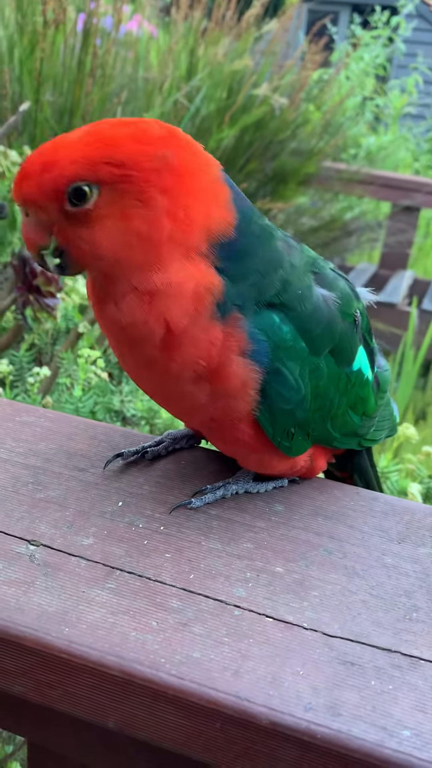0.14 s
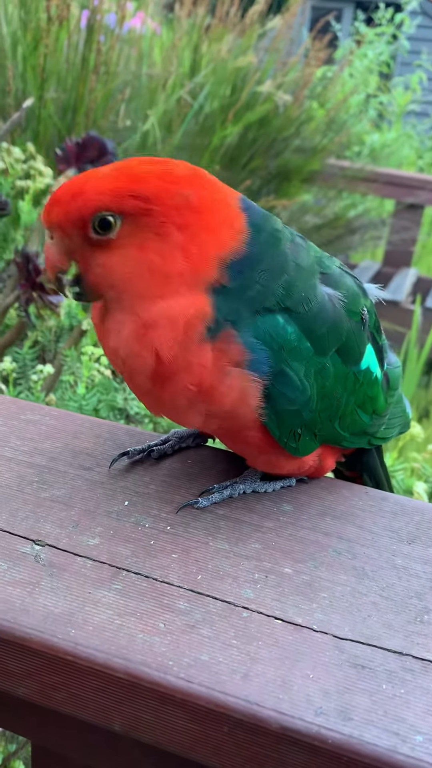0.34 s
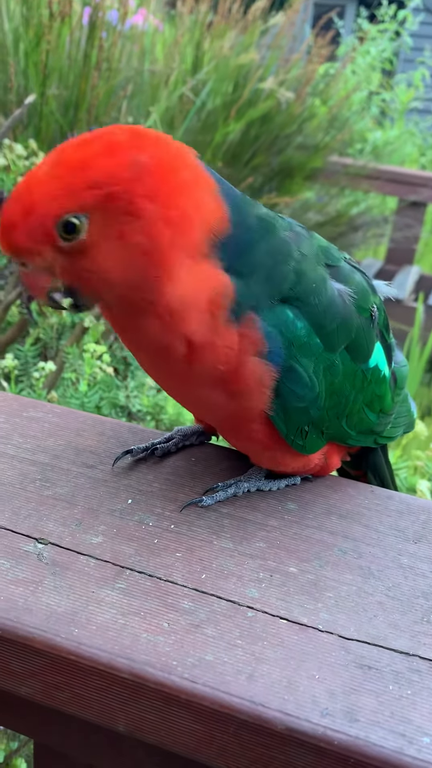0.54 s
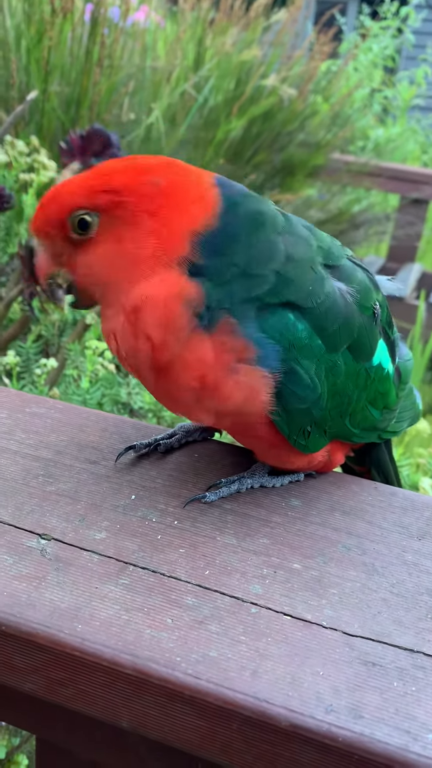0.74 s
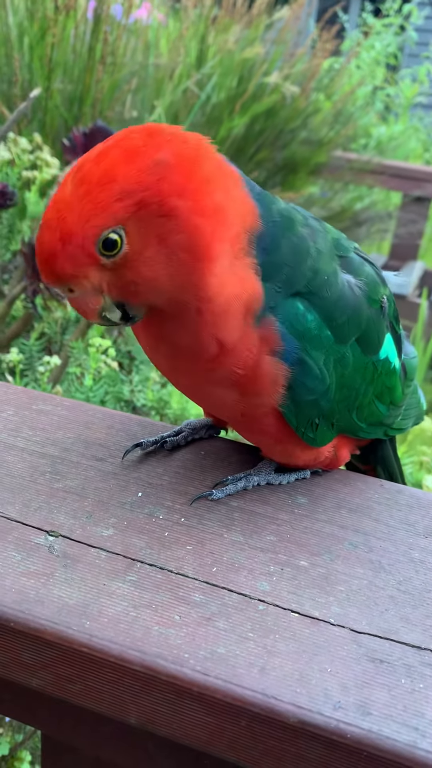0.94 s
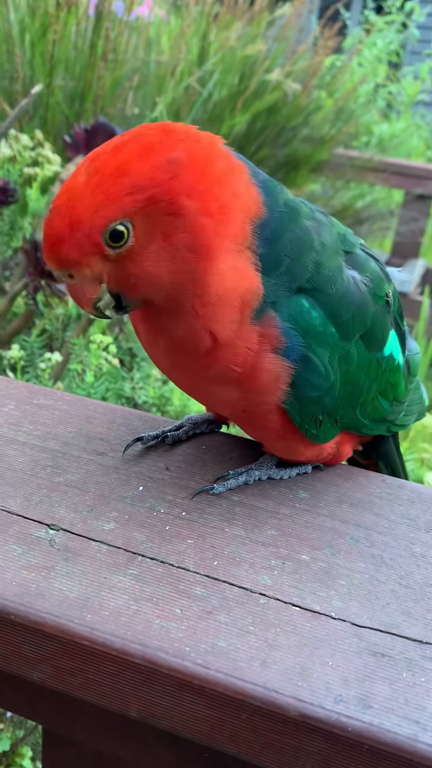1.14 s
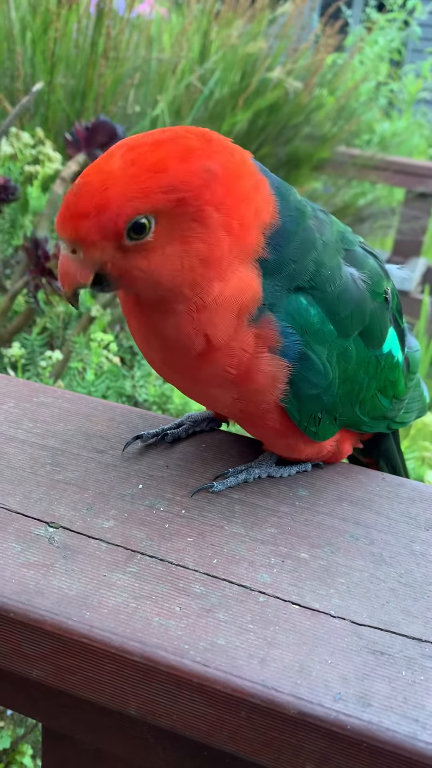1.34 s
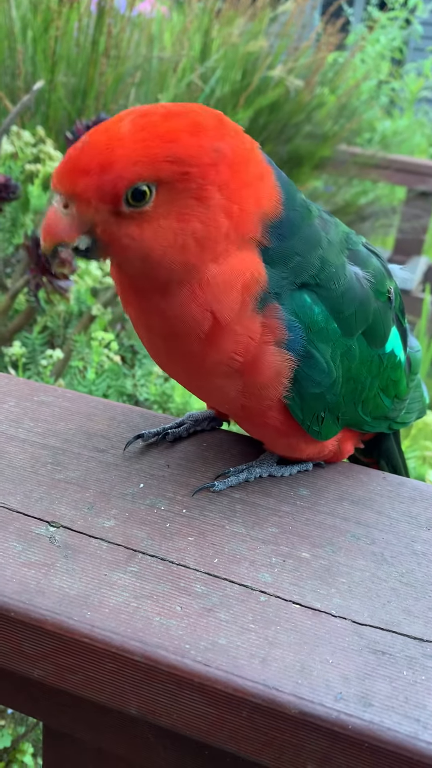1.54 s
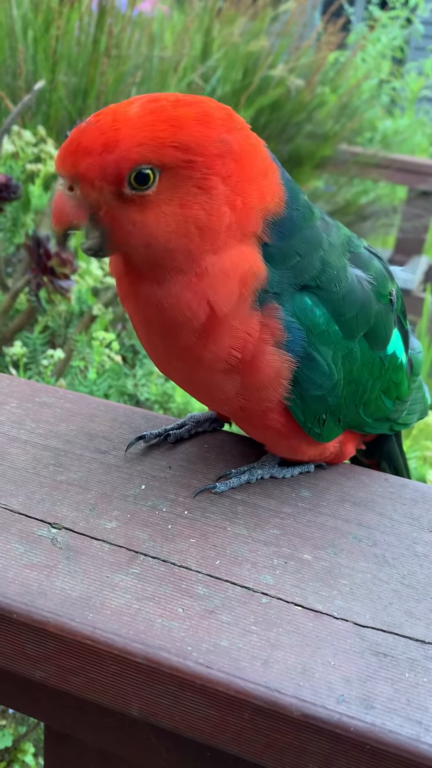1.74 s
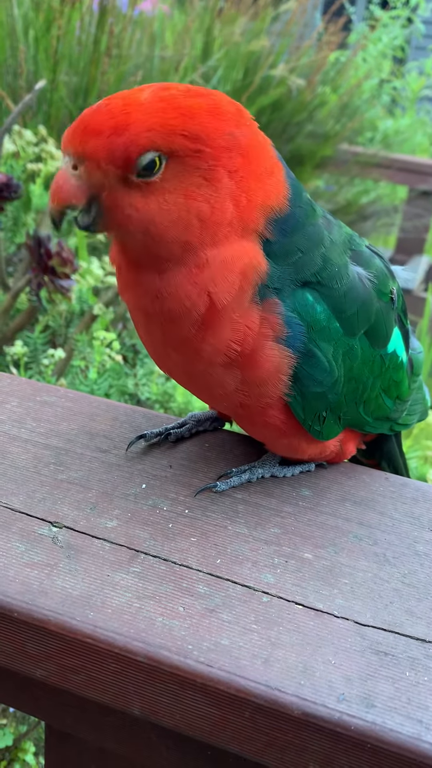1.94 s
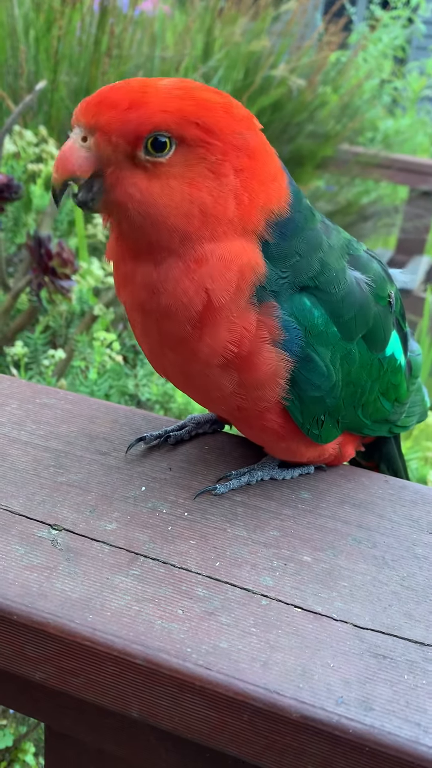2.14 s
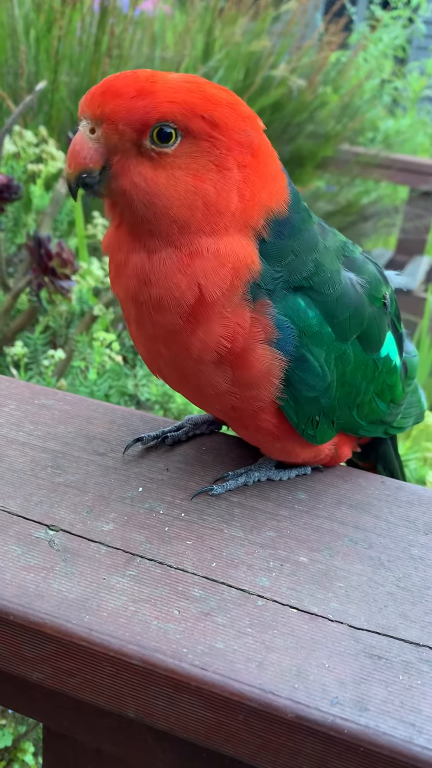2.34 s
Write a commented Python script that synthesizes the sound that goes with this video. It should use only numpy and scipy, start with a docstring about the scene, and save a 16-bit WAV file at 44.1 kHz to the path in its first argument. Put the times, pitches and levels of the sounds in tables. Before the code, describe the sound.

Close parrot squawks, bright and raspy, crowd the first second; afterwards come two weak wavering whines, tiny dry ticks and a dull knock, with light reflections from a deck and house wall outdoors.

```python
"""A garden by a house: a parrot gives harsh, mostly rising squawks close by, then two soft whines.
One side of its syrinx sings a bright harmonic tone that breaks into rasp; the other adds a lower note.
Filtered noise bursts make small ticks and one knock; arched sines whistle as far birds.
Shaped noise lays a low outdoor rumble; deck, house wall and plants answer the sounds by convolution."""
import sys
import numpy as np
from scipy import signal
from scipy.fft import rfft, irfft
from scipy.io import wavfile
from scipy.ndimage import uniform_filter1d

SR = 44100
rng = np.random.default_rng(int(sys.argv[2]) if len(sys.argv) > 2 else 0)


def to_wav(sig):
    """Store sig (one row per channel, or 1-D mono) as 16-bit WAV at the path in sys.argv[1].

    Samples outside -1..1 are clipped; the rate is SR.
    """
    pcm = np.clip(np.atleast_2d(sig), -1, 1) * 32767
    pcm = np.round(pcm).astype(np.int16)
    wavfile.write(sys.argv[1], SR, pcm.T)  # frames by channels


N = 105840  # samples: 2.4 s


def amp(db):
    """Decibels to gain."""
    return 10 ** (np.asarray(db) / 20)


def unit(x):
    """Scales to rms 1."""
    return x / np.sqrt(np.mean(x ** 2) + 1e-20)


def read(points, hz):
    """Reads a table on a log-frequency axis."""
    table_hz, value = np.transpose(points)
    return np.interp(np.log(hz + 1), np.log(table_hz + 1), value)


def add(mix, start_s, sound):
    """Mixes a sound in at its start time, cut off at the end of the mix."""
    part = mix[max(round(start_s * SR), 0):][:len(sound)]
    part += sound[:len(part)]


def colour(x, points):
    """Filters by a (freq_hz, gain_db) table, then scales to rms 1."""
    gain = amp(read(points, np.fft.rfftfreq(len(x), 1 / SR)))
    return unit(irfft(rfft(x) * gain, len(x)))


def wobble(rate_hz):
    """Smooth random drift: noise with a Gaussian roll-off at the rate, rms 1."""
    hz = np.fft.rfftfreq(N, 1 / SR)
    return unit(irfft(rfft(rng.standard_normal(N)) * np.exp(-(hz / rate_hz) ** 2), N))


def follow(rows):
    """The samples that a gesture spans, a short fade at its ends, and its interpolated controls."""
    time_s, *columns = np.transpose(rows)
    at = np.arange(int(time_s[0] * SR), int(time_s[-1] * SR))
    fade = np.clip(np.minimum(at - at[0], at[-1] - at) / 130, 0, 1)  # 130 samples, about 3 ms
    return at, fade, [np.interp(at / SR, time_s, column) for column in columns]


def stack(turns, gains):
    """Harmonics of a running phase in cycles, one gain per row, balanced to a nominal rms of 1."""
    k = np.arange(len(gains))[:, None] + 1
    waves = (gains * np.cos(2 * np.pi * k * turns)).sum(0)
    return np.sqrt(2) * waves / np.linalg.norm(gains, axis=0)


# outdoor background spectrum, relative: freq_hz, density_db (per Hz)
AIR_COLOUR = [(30, -36), (55, 6.5), (72, -5.5), (95, -3.5), (135, -6.5), (170, -18), (410, -18.5),
              (600, -24), (1400, -27), (2500, -36), (4000, -42), (7000, -48), (15500, -49.5)]
# left-right likeness of the air: freq_hz, likeness (1 = identical)
AIR_LIKENESS = [(60, 0.98), (130, 0.95), (290, 0.74), (640, 0.078), (4500, 1)]
AIR_DB, AIR_PATCH_DB = -53, 2.5  # overall level; rms drift of the patches


def air():
    """Low rumble and faint hiss: random spectra whose level drifts in patches of time and pitch."""
    size = 4096
    hz = np.fft.rfftfreq(size, 1 / SR)
    a, b, c, d, patches = rng.standard_normal((N // 1024 + 5, len(hz), 5)).T
    patches = uniform_filter1d(patches, size=14, axis=0)  # smooth over frequency
    patches = unit(uniform_filter1d(patches, size=7, axis=1))  # then over time
    same = np.clip(read(AIR_LIKENESS, hz), -1, 1)[:, None]
    left = a + 1j * b
    right = same * left + np.sqrt(1 - same ** 2) * (c + 1j * d)
    level = amp(read(AIR_COLOUR, hz)[:, None] + AIR_PATCH_DB * patches)
    noise = signal.istft(np.array([left, right]) * level, nperseg=size, noverlap=size - size // 4)[1]
    return amp(AIR_DB) * unit(noise[:, :N])


# far birds: start_s, length_s, pitch_hz (at the top of the arch), peak_db
FAR_WHISTLES = [(1.029, 0.086, 1940, -60), (1.29, 0.12, 1886, -69), (1.557, 0.097, 1945, -68.5)]


def far_birds():
    """Faint sine whistles, slightly arched: pitch and level swell and sink together."""
    out = np.zeros(N)
    for start_s, length_s, pitch_hz, peak_db in FAR_WHISTLES:
        arch = np.sin(np.pi * np.arange(0, 1, 1 / (length_s * SR)))
        bend = 0.03 * (arch - 1) + 0.015 * wobble(150)[:len(arch)]
        turns = np.cumsum(pitch_hz * (1 + bend)) / SR
        add(out, start_s, amp(peak_db) * arch * np.sin(2 * np.pi * turns))
    return out


def tap(onset_db, decay_s, points):
    """A short burst of coloured noise that dies away exponentially at once."""
    decay = np.exp(-np.arange(N) / SR / decay_s)
    return amp(onset_db) * decay * colour(rng.standard_normal(N), points)


# dry ticks of beak or claw: start_s, onset_db
TICK_HITS = [(1.782, -51), (1.809, -53), (1.907, -60)]
# bright colour of a tick: freq_hz, gain_db
TICK_TINT = [(500, -33), (2500, -9), (4500, 2), (8000, -20), (15000, -9)]
# dull colour of the knock: freq_hz, gain_db
KNOCK_TINT = [(100, -20), (380, -9), (1050, 7.5), (1600, -5), (4500, -13), (12000, -33)]
TICK_DECAY_S = 0.001
KNOCK_START_S, KNOCK_ONSET_DB, KNOCK_DECAY_S = 2.246, -53, 0.0097


def taps():
    """Small ticks and one dull knock, each a fast-decaying noise burst."""
    out = np.zeros(N)
    for start_s, onset_db in TICK_HITS:
        add(out, start_s, tap(onset_db, TICK_DECAY_S, TICK_TINT))
    add(out, KNOCK_START_S, tap(KNOCK_ONSET_DB, KNOCK_DECAY_S, KNOCK_TINT))
    return out


# unsteadiness of the voices: rates of pitch jitter and of level shimmer
JITTER_HZ, SHIMMER_HZ = 420, 160
# soft whines, one list per gesture: time_s, pitch_hz, level_db
WHINE_GESTURES = [
    [(1.632, 1554, -68), (1.66, 1731, -63), (1.70, 1720, -57), (1.757, 1774, -65.5)],
    [(1.843, 1682, -56.5), (1.862, 1743, -57.5), (1.897, 1763, -51.5), (1.945, 1800, -64)],
    [(1.905, 1529, -45), (1.918, 1281, -55), (1.96, 1341, -61)],
]
# throat colour of the whines: freq_hz, gain_db
WHINE_TINT = [(1250, 0), (1750, 5), (2650, 3.5), (3550, -1), (4200, -26.5)]
WHINE_JITTER, WHINE_BREAK_JITTER, WHINE_SHIMMER = 0.015, 0.022, 0.31  # rms shares
WHINE_BREAK_HZ = 1600  # below this pitch the voice turns rougher


def whines():
    """Two quiet, wavering notes; under the end of the second, the other voice falls away roughly."""
    out, k = np.zeros(N), np.arange(1, 8)[:, None]
    for rows in WHINE_GESTURES:
        at, fade, (pitch_hz, level_db) = follow(rows)
        depth = np.where(pitch_hz < WHINE_BREAK_HZ, WHINE_BREAK_JITTER, WHINE_JITTER)
        turns = np.cumsum(pitch_hz * (1 + depth * wobble(JITTER_HZ)[at])) / SR
        tone = stack(turns, amp(read(WHINE_TINT, k * pitch_hz)))
        shimmer = 1 + WHINE_SHIMMER * wobble(SHIMMER_HZ)[at]
        out[at] += fade * amp(level_db) * shimmer * tone
    return out


# held note of the lower voice: time_s, pitch_hz, level_db
LOW_GESTURE = [(.412, 852, -49), (.43, 862.6, -40), (.48, 853, -36), (.492, 870, -42.5), (.505, 900, -50)]
# its harmonics from the first up, odd ones leading: gain_db
LOW_HARMONICS = [-4, -13, 2, -41, -4.5, -20]


def low_voice():
    """The other side of the syrinx: a steadier, hollow note of mostly odd harmonics."""
    out = np.zeros(N)
    at, fade, (pitch_hz, level_db) = follow(LOW_GESTURE)
    turns = np.cumsum(pitch_hz * (1 + 0.0057 * wobble(180)[at])) / SR
    out[at] = fade * amp(level_db) * stack(turns, amp(LOW_HARMONICS)[:, None])
    return out


# sung notes, one list each: time_s, pitch_hz, tone_db, rasp_db, throat_boost_db
SQUAWK_NOTES = [
    [(.211, 1148, -49, -81, 12), (.226, 1245, -49.5, -47.5, 10), (.252, 1367, -36, -42, 5),
     (.272, 1365, -47, -38, 8.5), (.315, 1401, -36, -36, 20), (.36, 1452, -51, -49.5, -1)],
    [(.342, 1545, -40, -72, -21), (.365, 1593, -43, -76, -3), (.435, 1701, -41, -50, -9),
     (.474, 1739, -44, -45.5, -8), (.485, 1768, -28.5, -55, 39), (.496, 1810, -39, -57, 17)],
    [(.484, 1353, -50, -38, 4), (.5, 1360, -43.5, -35.5, 2), (.517, 1447, -33.5, -35.5, 42),
     (.537, 1437, -45.5, -55, 13)],
    [(.586, 1505, -57, -89, -11), (.606, 1624, -39, -48, -1), (.665, 1693, -45.5, -73, -10)],
    [(.603, 1285, -48, -41.5, 39), (.622, 1350, -32, -34.5, 24.5), (.671, 1420, -32.5, -33, 33),
     (.686, 1477, -28.5, -45, 32), (.7, 1543, -27.5, -50, 36), (.716, 1494, -45, -47, 20)],
    [(.802, 1223, -66, -45, 24), (.814, 1302, -45, -39, 24), (.836, 1387, -33, -39.5, 7.5),
     (.855, 1433, -36, -38, 25.5), (.882, 1515, -32.5, -41.5, 42), (.903, 1562, -37, -50, 8),
     (.922, 1555, -49, -46, 4)],
    [(1.0, 1173, -44, -62.5, 13), (1.01, 1288, -44, -50, 16.5), (1.025, 1400, -38, -74, -5.5),
     (1.045, 1492, -50.5, -71, 8), (1.088, 1574, -42, -69, -1.5), (1.108, 1471, -45, -70, 8)],
]
# centre of the throat resonance in each note: freq_hz
THROAT_CENTRES = [2790, 3500, 4420, 3420, 4510, 4000, 2570]
# throat colour of the clear tone, before the boost: freq_hz, gain_db
TONE_TINT = [(1100, 11), (1500, 0.5), (3000, -3.5), (4700, -20.5), (5400, -14.5), (7300, -19.5),
             (8300, -24.5), (12000, -25.5), (15500, -40)]
# throat colour of the rasp: freq_hz, gain_db
RASP_TINT = [(400, -43.5), (880, -4.5), (1050, -12), (1450, -11.5), (1950, -5.5), (2700, 4), (3150, -4),
             (3600, 3.5), (4400, -1), (5200, -9.5), (7200, -17), (8300, -16.5), (11000, -19), (15500, -26)]
THROAT_OCTAVES = .52  # half-width of the resonance, where its boost in dB falls to 1/e
JITTER_CLEAN, JITTER_ROUGH, SHIMMER = .004, .019, .09  # rms shares; rough jitter grows with the rasp
RAGGED_HZ = 7000  # above this, the harmonics of the tone are all flutter
FLUTTER_HZ = 210  # spreads each harmonic of the rasp into a rough band
SMEAR = 0.0562  # rms share of extra pitch scatter in the rasp
HALF_LINES = 0.54  # share of period doubling in the rasp
PUFF_SHARE, PUFF_CYCLES = .55, 0.9  # share of air puffs; decay of each, in cycles
LOW_SIDE_HZ, LOW_SIDE_SHARE, LOW_SIDE_SCATTER = 899.4, 0.17, 0.0325  # lower voice rattling along
GRAIN, GRAIN_HZ = .3, 330  # rms share and rate of the rasp's level grain


def squawks():
    """A harmonic tone that breaks into rasp: fluttering harmonics, lower voice, half lines, air puffs."""
    out, k = np.zeros(N), np.arange(1, 13)[:, None]
    for rows, throat_hz in zip(SQUAWK_NOTES, THROAT_CENTRES):
        at, fade, (pitch_hz, tone_db, rasp_db, boost_db) = follow(rows)
        throat = np.exp(-(np.log2(k * pitch_hz / throat_hz) / THROAT_OCTAVES) ** 2)
        rough = 1 / (1 + amp(tone_db - rasp_db) ** 2)  # the rasp's share of the power
        jitter = (JITTER_CLEAN + JITTER_ROUGH * rough) * wobble(JITTER_HZ)[at]
        turns = np.cumsum(pitch_hz * (1 + jitter)) / SR

        # each harmonic reads its own stretch of one wobble; the higher it is, the more it breaks up
        flutter = wobble(FLUTTER_HZ)[(at + k * len(at)) % N]
        ragged = np.minimum(k * pitch_hz / RAGGED_HZ, 1) ** 2
        broken = np.sqrt(1 - ragged ** 2) + ragged * flutter
        tone = stack(turns, broken * amp(read(TONE_TINT, k * pitch_hz) + boost_db * throat))

        smeared = turns + np.cumsum(pitch_hz * SMEAR * wobble(1000)[at]) / SR
        pulses = unit((flutter * np.cos(2 * np.pi * k * smeared)).sum(0))
        low_turns = np.cumsum(LOW_SIDE_HZ * (1 + LOW_SIDE_SCATTER * wobble(JITTER_HZ)[at])) / SR
        low = stack(low_turns, np.ones(k.shape))
        halves = unit(np.cos(2 * np.pi * (k + .5) * turns).sum(0))
        puffs = unit(np.exp(-(turns % 1) / PUFF_CYCLES) * rng.standard_normal(N)[at])
        drive = pulses + LOW_SIDE_SHARE * low + HALF_LINES * halves + PUFF_SHARE * puffs
        rasp = colour(drive * (1 + GRAIN * wobble(GRAIN_HZ)[at]), RASP_TINT)

        shimmer = 1 + SHIMMER * wobble(SHIMMER_HZ)[at]
        out[at] += fade * shimmer * (amp(tone_db) * tone + amp(rasp_db) * rasp)
    return out


# time for the tail to fall by 60 dB: freq_hz, decay_s
TAIL_DECAY = [(1400, 0.45), (2900, 0.54), (4500, 0.4), (15000, 0.49)]
TAIL_DB, EARLY_DB, EARLY_DECAY_S = -11.5, -5.5, 0.013
WALL_DELAY_S, WALL_DB, WALL_TREBLE_HZ = .07, -12.5, 4500
ECHO_APART = .35  # share of the echo that differs, with opposite sign, between left and right


def garden(x):
    """Quick reflections from the deck, one echo from the house wall, and a short tail from the plants."""
    hz, t, z = signal.stft(rng.standard_normal((2, SR)), SR, nperseg=256)
    decay = amp(-60 * t / read(TAIL_DECAY, hz)[:, None])
    tail = signal.istft(z * decay, SR, nperseg=256)[1]
    t = np.arange(tail.shape[1]) / SR
    tail = tail * np.minimum(t / 0.004, 1)  # 4 ms rise
    early = rng.standard_normal(tail.shape) * np.exp(-t / EARLY_DECAY_S) * (t > .002)
    tail = amp(TAIL_DB) * tail / np.linalg.norm(tail[0])
    early = amp(EARLY_DB) * early / np.linalg.norm(early[0])
    shared, apart = tail + early
    add(shared, WALL_DELAY_S, amp(WALL_DB) * signal.firwin(15, WALL_TREBLE_HZ, fs=SR))
    both = np.array([shared + ECHO_APART * apart, shared - ECHO_APART * apart])
    return signal.fftconvolve(x[None], both, axes=1)[:, :N]


WHINE_ECHO, FAR_ECHO = 1.75, 2  # gains into the garden echo


def scene():
    """The parrot and small sounds, their echo, and the air."""
    near, soft, far = squawks() + low_voice() + taps(), whines(), far_birds()
    echo = garden(near + WHINE_ECHO * soft + FAR_ECHO * far)
    return near + soft + far + echo + air()


# phase by which the left port leads the right: freq_hz, lead_rad
PORT_LEAD = [(0, 0), (400, .15), (900, .8), (1400, .15), (2600, 1.9), (3500, 1.1), (4500, 2.9), (5100, 3.4),
             (7000, 6.4), (8400, 9.0), (9500, 9.8), (11000, 12.6), (12700, 15.4), (13800, 16), (15500, 19)]
# level of the left port over the right: freq_hz, difference_db
PORT_LEVEL = [(60, -0.5), (250, -3), (900, -1.5), (2700, 0.5), (5000, 0)]
EDGE_HZ = 15850  # upper band limit


def record(dry):
    """Two microphone ports that differ in phase and level, half the difference each; then the band limit."""
    hz = np.fft.rfftfreq(N, 1 / SR)
    lead = amp(read(PORT_LEVEL, hz) / 2) * np.exp(.5j * read(PORT_LEAD, hz))
    ports = irfft(rfft(dry) * np.array([lead, 1 / lead]), N)
    lowpass = signal.firwin(511, EDGE_HZ, window=("kaiser", 9), fs=SR)
    return signal.oaconvolve(ports, lowpass[None], "same")


dry = scene()
out = record(dry)
to_wav(out)
```